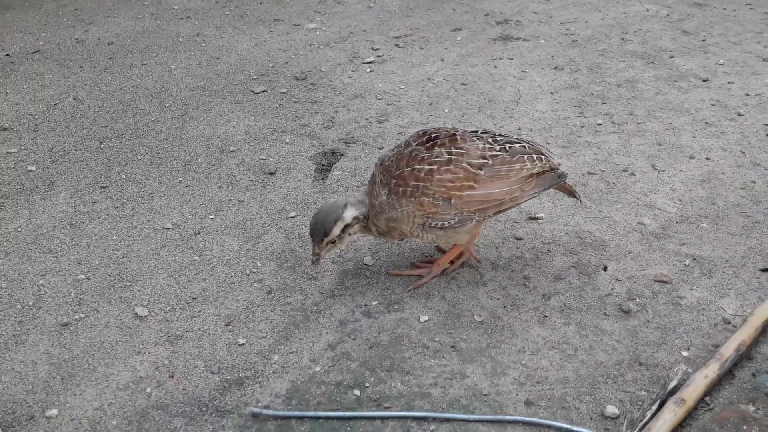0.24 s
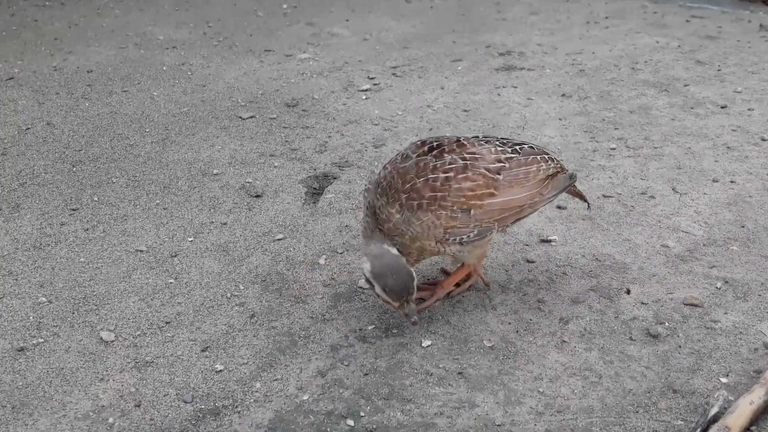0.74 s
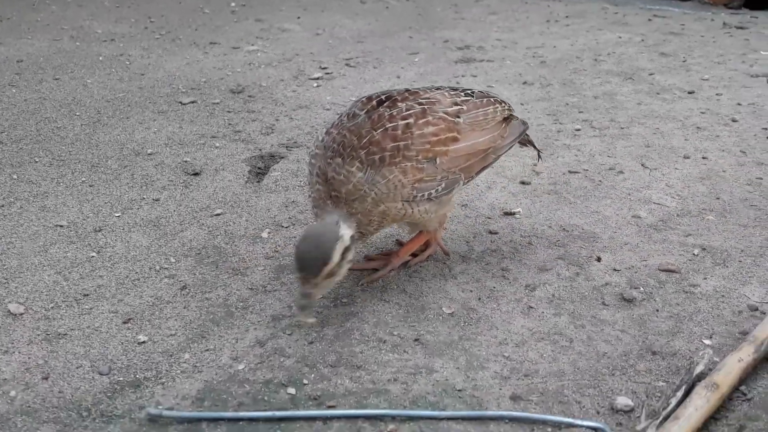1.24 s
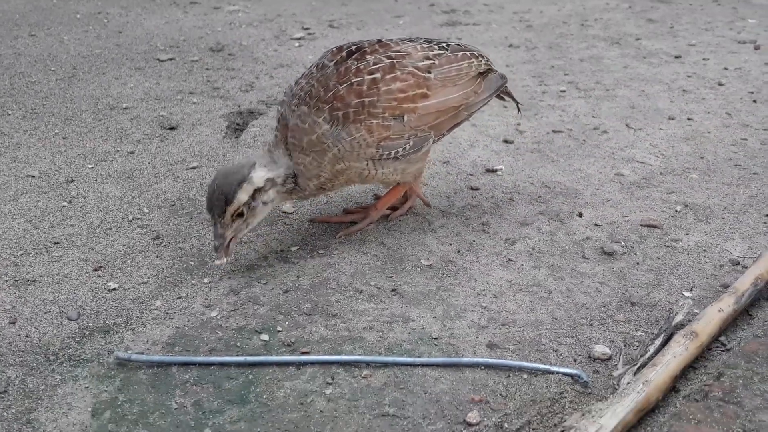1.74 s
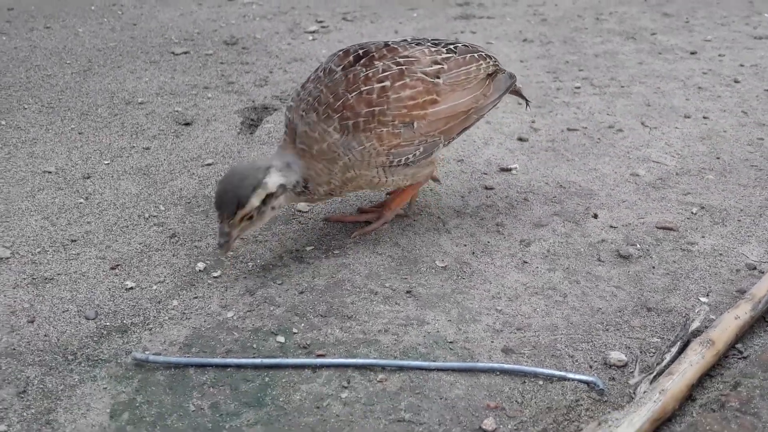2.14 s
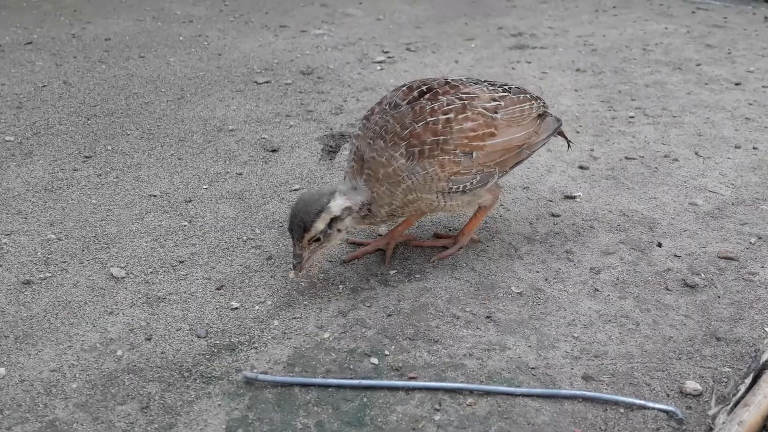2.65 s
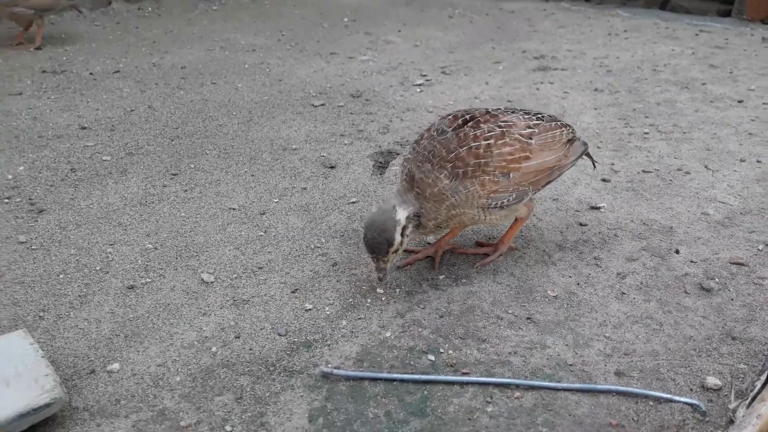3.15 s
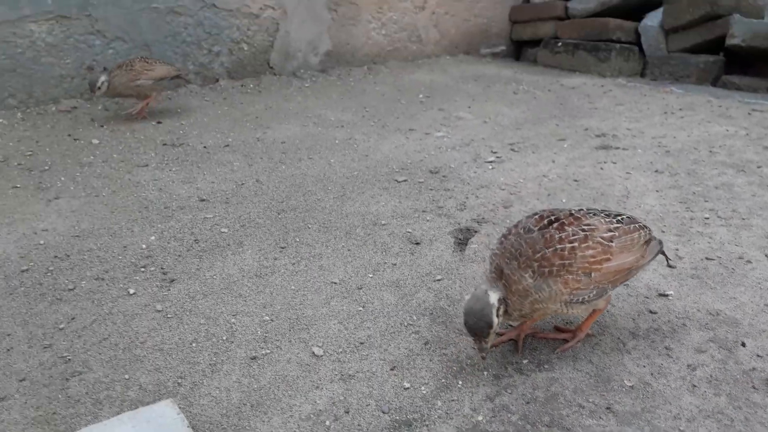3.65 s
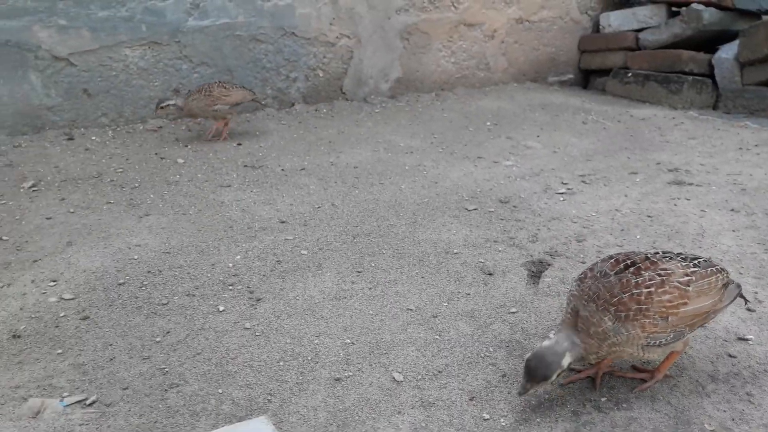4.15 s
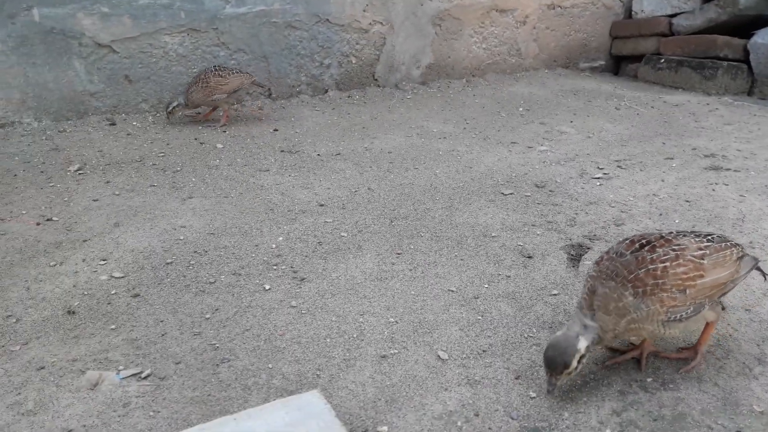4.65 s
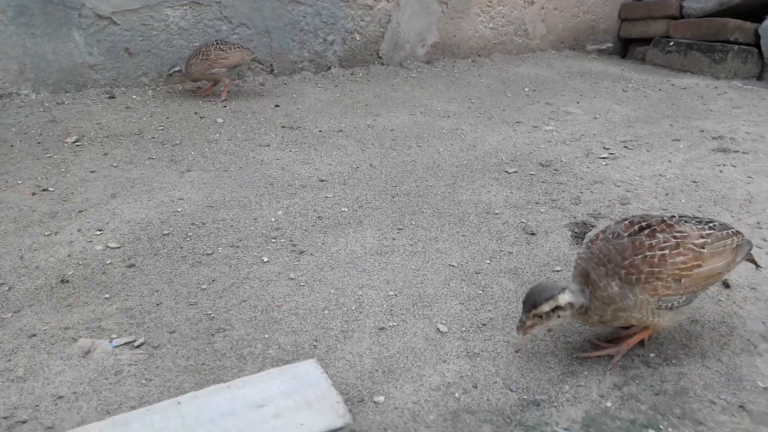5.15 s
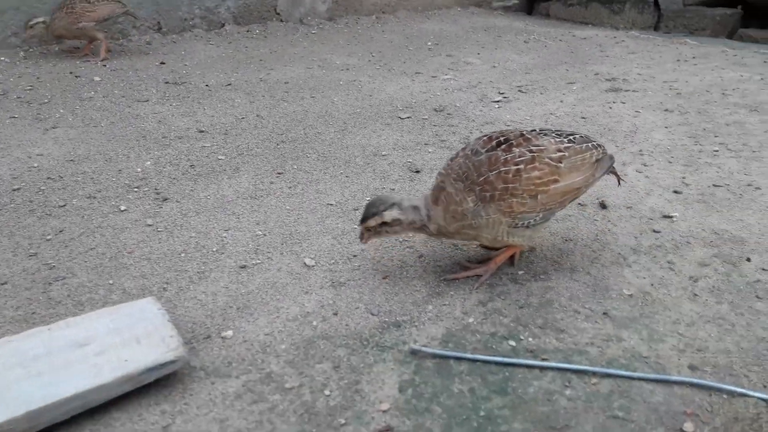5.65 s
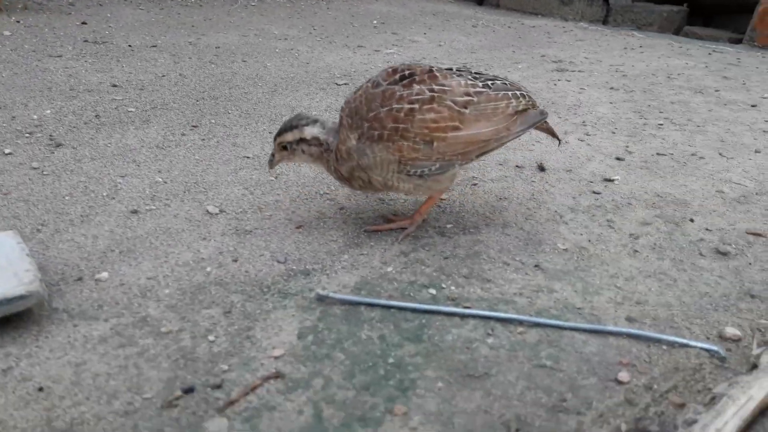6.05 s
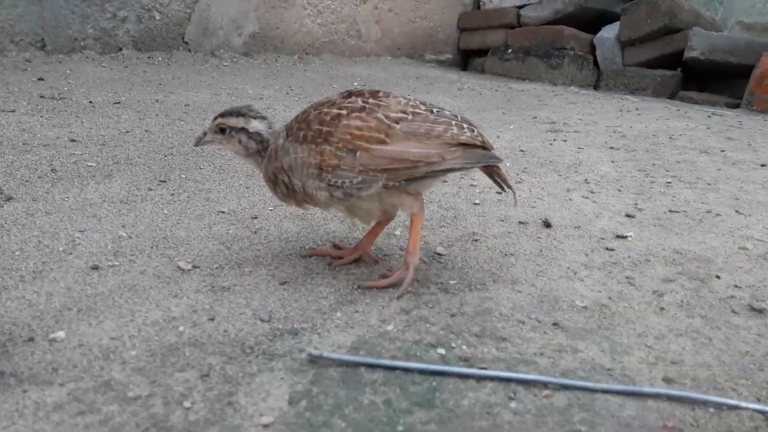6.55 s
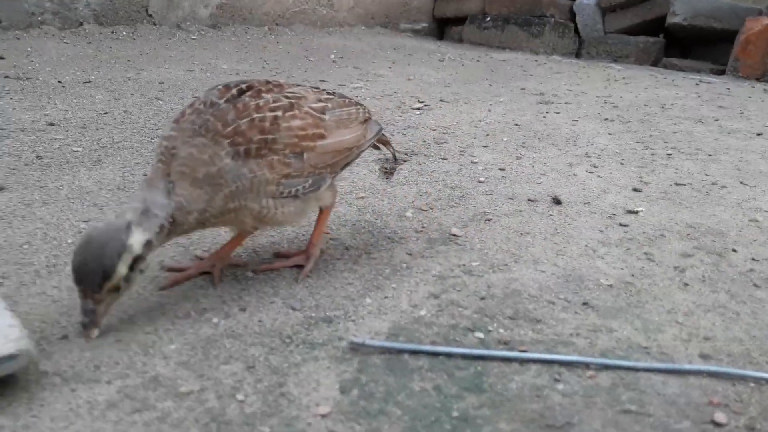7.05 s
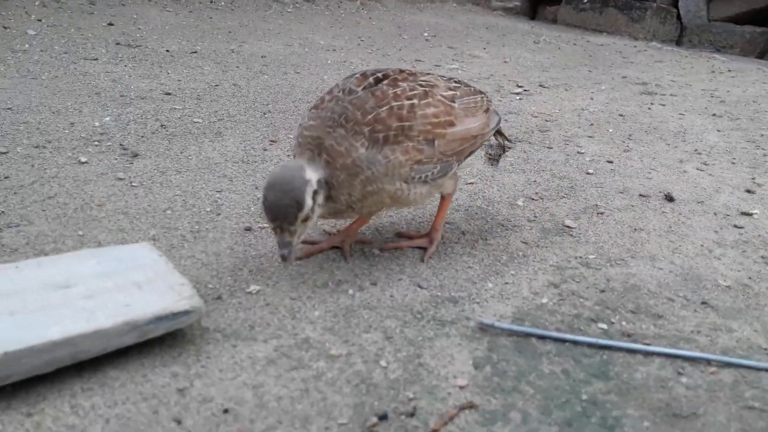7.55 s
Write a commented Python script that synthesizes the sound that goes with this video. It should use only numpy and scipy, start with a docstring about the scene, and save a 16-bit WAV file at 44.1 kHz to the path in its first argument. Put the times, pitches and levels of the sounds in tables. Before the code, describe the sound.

High peeps of feeding quail mix with pecks, scratching and sharp knocks outdoors, over a faint throbbing insect and low town rumble.

```python
"""Young quail peep and cluck as they feed in a sandy concrete yard. From the start an insect throbs
about eight times a second over a low town rumble. Soon feet scuff the grit, beaks tap the ground and
faint whines drift in. Something knocks and thumps nearby, hardest at about 2.5 s, just before a gust
of wind. From 4 s to nearly 6 s a far bird crows; then come more taps, scuffs and knocks as the
quail peep on."""
import sys
import numpy as np
from scipy import signal
from scipy.fft import rfft, irfft, next_fast_len
from scipy.io import wavfile
from scipy.ndimage import uniform_filter1d

SR = 44100
rng = np.random.default_rng(int(sys.argv[2]) if len(sys.argv) > 2 else 0)


def store_pcm(level_fs):
    """Save levels as 16-bit WAV."""
    pcm = np.round(np.clip(level_fs, -1, 1) * 32767).astype(np.int16)
    wavfile.write(sys.argv[1], SR, np.atleast_2d(pcm).T)


N = 343539


def bird_note(times, pitches, levels, octave_db, edge_s=0.0061):
    """A bird's voice box glides through 3 pitches (a slide) or 5 (a slide, then a flip up and down)."""
    t = np.arange(int(times[-1] * SR - 1)) / SR
    place = np.interp(t, times, np.arange(len(times)))
    stage, progress = place.astype(int), place % 1  # stages: 0 start, 1 slide, 2 flip up, 3 drop
    glide = .5 - .5 * np.cos(np.pi * progress ** np.where(stage == 2, 1.3, .75))
    rounded_top, plunge = 1 - (1 - glide) ** 1.8, progress ** 2.4
    ease = np.choose(stage, [np.sin(np.pi * progress / 2), glide, rounded_top, plunge])
    pitch = np.take(pitches, stage) + np.diff(pitches)[stage] * ease
    pitch *= 1 + 0.0087 * waver(len(t), 160).real
    phase = 2 * np.pi * np.cumsum(pitch) / SR
    edge = np.minimum(t / 2.6, 1.6 * (t[-1] - t)) / edge_s  # slow start, quick end
    fade = np.sin(np.pi / 2 * np.clip(edge, 0, 1)) ** 2
    level_db = np.interp(t, *levels) + 1.6 * waver(len(t), 70).real
    # The voice cracks in the flip: a bigger leap flutters more and is weaker at the top.
    leap_khz = np.clip(3 * (place - 2), 0, 1) * np.ptp(pitches[2:]) / 1000
    height = np.clip((pitch - pitches[-1]) / np.ptp(pitches), 0, 1)
    level_db += leap_khz * (1.7 * waver(len(t), 250).real - 2.2 * height)
    # The octave (twice the pitch) drops out in the flip and on high notes.
    octave = amp(octave_db) * np.clip(2 - 3 * (place - 1.9), 0, 1) / (1 + (pitch / 2850) ** 20)
    return np.sqrt(2) * amp(level_db) * fade * (np.sin(phase) + octave * np.sin(2 * phase))


# Peeps of the near quail: (time [s], length before the flip [s], crest pitch [Hz], low pitch [Hz],
# early level [dB], late level [dB], top pitch of the flip [Hz], flip level [dB])
PEEPS = [(0.128, 0.055, 2240, 1590, -56, -51.5, 3230, -53.5),
         (0.322, 0.058, 2420, 1810, -56, -53.5, 3350, -52),
         (0.522, 0.05, 2970, 2490, -46, -63, 3840, -50.5),
         (0.677, 0.051, 3403, 2990, -40.5, -38.5, 4090, -35.5),
         (.745, 0.029, 3300, 2320, -60, -56, 4650, -41.5),
         (0.865, 0.042, 3237, 3360, -38, -38, 4520, -36.5),
         (1.195, 0.057, 2020, 1600, -45.5, -48, 3070, -48), (1.242, 0.047, 1810, 1700, -48, -57, 4620, -51),
         (1.423, 0.042, 2700, 2380, -54, -48, 3830, -42.5),
         (1.593, 0.044, 3250, 2750, -39.5, -46, 3920, -41),
         (1.689, 0.043, 4150, 3340, -72, -53, 4830, -45.5), (1.703, 0.029, 3500, 2640, -58, -52, 3600, -58),
         (1.763, 0.044, 3367, 3080, -41.5, -39.5, 4240, -40.5),
         (2.024, 0.06, 2190, 1560, -46, -50.5, 3390, -49.5),
         (2.108, 0.036, 1850, 1687, -48, -43, 4320, -57), (2.233, 0.056, 3360, 2620, -39.5, -54, 3970, -42),
         (2.768, 0.052, 2210, 1535, -50, -48, 3010, -53.5),
         (2.95, 0.049, 2213, 1950, -43, -46.5, 3780, -50.5),
         (3.166, 0.047, 3000, 2260, -49, -57, 3510, -45.5),
         (3.274, 0.044, 2090, 1845, -58, -43.5, 4820, -57),
         (3.409, 0.046, 3565, 2905, -37.5, -39, 3900, -44.5),
         (3.611, 0.046, 3400, 2613, -42, -44.5, 3760, -41.5),
         (3.758, 0.043, 4030, 3000, -59, -62.5, 3900, -56.5),
         (3.818, 0.045, 3567, 3347, -41, -41, 4090, -52.5), (4.457, 0.025, 3200, 2600, -56, -61, 4400, -56),
         (4.586, 0.043, 3530, 2790, -40, -41.5, 3800, -43),
         (4.802, 0.031, 3515, 2940, -65, -51.5, 4150, -53),
         (4.846, 0.046, 4160, 3814, -47.5, -38, 4250, -41.5),
         (4.974, 0.038, 1910, 1654, -47, -51, 4440, -54), (5.107, 0.034, 4270, 3570, -80, -50.5, 4380, -55),
         (5.208, 0.065, 1780, 1363, -42.5, -50, 2540, -54),
         (5.214, 0.031, 2800, 2110, -57, -51, 4620, -49.5), (5.222, 0.046, 3600, 2720, -64, -50, 3550, -62),
         (5.391, 0.014, 4700, 4400, -71, -56, 5115, -43.5),
         (5.409, 0.047, 2740, 2000, -49, -49, 3470, -47.5),
         (5.598, .051, 2925, 2460, -47.5, -53.5, 3900, -34.5),
         (5.656, .06, 2075, 1805, -48, -43, 5110, -51.5), (5.791, 0.054, 3900, 3520, -45, -37, 3970, -37.5),
         (5.838, 0.048, 2550, 1947, -47.5, -38.5, 4780, -45.5),
         (6.117, 0.037, 2266, 1970, -58, -53.5, 4030, -56),
         (6.248, 0.067, 2170, 1440, -56, -50, 2620, -47.5), (6.334, 0.033, 3640, 2950, -69, -45, 4650, -51),
         (6.478, 0.029, 2450, 2304, -60, -44.5, 3750, -53), (6.509, 0.041, 2300, 1832, -47, -43, 5030, -37),
         (6.631, 0.036, 4160, 3840, -55, -50, 4740, -45), (6.637, 0.024, 1760, 1660, -52, -58, 3160, -44.5),
         (6.681, 0.044, 2810, 2102, -44.5, -40.5, 5180, -44),
         (6.965, 0.045, 3480, 2904, -39, -39, 3900, -37), (6.977, 0.048, 2210, 1824, -46, -44, 5100, -44),
         (7.175, 0.064, 4720, 2585, -78, -42, 5140, -43.5),
         (7.395, 0.066, 1830, 1168, -45, -48, 4430, -45.5),
         (7.595, 0.043, 2366, 1790, -42.5, -43, 3620, -38),
         (7.68, 0.043, 2104, 1806, -47, -42.5, 4780, -45),
         (7.737, 0.038, 3900, 2750, -66, -43, 4400, -42.5)]
def quail_peeps():
    """Each peep scoops up to a crest, slides down, then flips up and drops."""
    out = np.zeros(N)
    for start, slide_s, crest_hz, low_hz, early_db, late_db, top_hz, flip_db in PEEPS:
        # Higher peeps crest later and scoop up from further below.
        crest_s = min(0.00532 * crest_hz / 1000, .6 * slide_s)
        start_hz = crest_hz * (1 - 0.1113 * crest_hz / 3000)
        flip_s = .023 + .0058 * low_hz / 1000
        times = [0, crest_s, slide_s, slide_s + .5 * flip_s, slide_s + flip_s]
        pitches = [start_hz, crest_hz, low_hz, top_hz, 0.564 * low_hz]
        level_times = [.25 * slide_s, .75 * slide_s, slide_s, slide_s + .3 * flip_s, times[-1]]
        levels_db = [early_db, late_db, late_db, flip_db, flip_db - 3]
        add(out, start, bird_note(times, pitches, (level_times, levels_db), octave_db=-20))
    return out


# Softer notes and clucks: (time [s], length [s], start pitch [Hz], end pitch [Hz], level [dB])
CLUCKS = [(0.107, 0.06, 4080, 2500, -59), (0.485, 0.037, 1773, 1700, -47.5),
          (0.58, 0.027, 1072, 704, -54.5), (.6, 0.13, 550, 488, -62.5), (0.983, 0.077, 1620, 1456, -55),
          (1.103, 0.089, 2250, 1270, -60.5), (1.308, 0.064, 2060, 1370, -60),
          (1.478, 0.035, 2260, 2157, -46.5), (1.547, .05, 2150, 1700, -67),
          (1.841, 0.046, 1740, 1400, -55.5), (1.884, 0.065, 1744, 1524, -53),
          (2.364, 0.037, 2460, 2030, -52), (2.536, 0.031, 2710, 2060, -54.5),
          (2.746, 0.056, 2230, 1936, -47.5), (4.347, 0.064, 3130, 1830, -51),
          (4.573, 0.041, 2200, 2100, -59), (5.397, 0.03, 3900, 2880, -62), (5.372, 0.041, 938, 805, -55.5),
          (5.448, .068, 548, 462, -59.5), (5.978, 0.035, 2210, 2010, -43), (6.009, 0.041, 2420, 2210, -53),
          (6.017, 0.066, 1870, 1600, -48.5), (6.348, 0.08, 2020, 1640, -54.5),
          (6.447, 0.019, 2170, 2200, -48.5), (6.75, 0.055, 940, 720, -54.5),
          (6.977, 0.036, 4050, 3500, -56), (7.203, .042, 1880, 1660, -60), (7.429, 0.054, 2900, 2417, -54),
          (7.618, 0.081, 657, 770, -61.5), (7.714, 0.088, 424, 362, -60.5)]
def quail_clucks():
    """Each note holds its pitch for a moment, then slides, with no flip."""
    out = np.zeros(N)
    for start, length, start_hz, end_hz, db in CLUCKS:
        times = [0, 0.133 * length, length]
        pitches = [start_hz, start_hz + 0.087 * (end_hz - start_hz), end_hz]
        octave_db = max(7 - 15 * end_hz / 1000, -20)  # low clucks are richer than high notes
        add(out, start, bird_note(times, pitches, ([0], [db]), octave_db, edge_s=0.005))
    return out


def far_flock(count=110):
    """Birds further off chime in around the near peeps with faint falling notes."""
    out = np.zeros(N)
    for which, when, long, high, loud in rng.random((count, 5)):
        length, hz = .03 + .045 * long, 950 * 4. ** high ** 1.5
        start = abs(PEEPS[int(which * len(PEEPS))][0] + .3 * when - .1)
        times, pitches = [0, .2 * length, length], [hz, hz, .72 * hz]
        if not 2.9 < start < 4:  # the flock pauses here
            add(out, start, bird_note(times, pitches, ([0], [-72 + 9 * loud]), -9., edge_s=.008))
    return out


# The tone of sand: (frequency [Hz], relative level [dB])
GRIT_TONE = [(40, -3), (500, 3), (2300, -5), (4500, -15.5), (7000, -32), (16000, -41.5)]
# Strokes through the sand: (start [s], end [s], level [dB], treble lift [dB per octave])
SCUFFS = [(0.56, 0.84, -49.5, 4), (0.62, 0.714, -46.5, 9.5), (0.903, 1.005, -52, 6),
          (1.21, 1.305, -48.5, 9.5), (1.383, 1.569, -46.5, 9), (1.436, 1.478, -29, 18),
          (2.145, 2.423, -45, 1.5), (2.351, 2.477, -53, 7), (2.567, 2.723, -46.5, 4.5),
          (2.688, 2.891, -47, 5.5), (2.838, 2.938, -48.5, 5), (3.144, 3.168, -45, 14.5),
          (4.38, 4.58, -50, -2), (5.424, 5.508, -50.5, 4), (5.975, 6.103, -54.5, 9), (6.18, 6.25, -56, 8.5),
          (6.296, 6.466, -57, 6), (6.498, 6.657, -55, 5), (6.868, 6.96, -55.5, 8.5),
          (7.366, 7.409, -37.5, 12)]
def scuffs():
    """Feet and beaks drag through uneven grains of sand; each stroke swells and dies."""
    out = np.zeros(N)
    for start, end, db, tilt_db in SCUFFS:
        size = round((end - start) * SR)
        grains = rng.standard_normal(size)
        grains *= amp(3.5 * np.minimum(rng.exponential(1, size), 5) + 4. * waver(size, 110).real)
        grit = filtered(grains, lambda hz: tone_db(GRIT_TONE, hz) + tilt_db * np.log2((hz + 50) / 2000))
        swell = np.interp(np.linspace(0, 1, size), [0, 0.28, 1], [0, 1, 0]) ** 1.2
        add(out, start, amp(db) * unit_level(grit) * swell)
    return out


# Beak taps: (time [s], peak level [dB])
PECKS = [(1.242, -24), (1.4448, -31), (1.449, -30), (6.192, -44), (6.3215, -42), (6.4132, -40),
         (6.514, -38), (6.6275, -38), (7.6043, -38)]
def pecks(centre_hz=3200, fade_s=.002):
    """A beak hits concrete: a dry, bright click with a wisp of noise after it."""
    out, t = np.zeros(N), np.arange(400) / SR
    for start, db in PECKS:
        click = (rng.standard_normal(len(t)) + 5 * (t == 0)) * amp(-60 * t / fade_s)
        snap = filtered(np.roll(click, 20), lambda hz: -2.5 * np.log2((hz + 50) / centre_hz) ** 2)
        add(out, start, amp(db) * snap / abs(snap).max())
    return out


# Ringing tones in a tick: (highest pitch [Hz], relative level [dB], time to fade by 60 dB [s])
TICK_TONES = [(1700, -3.5, 0.018), (2260, 14.5, 0.003), (3900, 13.5, 0.0021), (740, 11, 0.0041)]
# Nearby knocks: (time [s], tick peak [dB], thump peak [dB], thump pitch [Hz])
KNOCKS = [(.19, -33, -48, 259), (0.257, -40.5, -45, 302), (0.785, -35.5, -38, 170),
          (1.317, -33.5, -42, 190), (1.845, -39.5, -47, 292), (1.904, -51, -38.5, 115),
          (2.294, -18.5, -32.5, 110), (2.423, -26.5, -28, 129), (2.567, -12, -25.5, 93),
          (2.741, -35, -40, 99), (3.101, -38.5, -31, 102.5), (3.724, -41.5, -49.5, 69.5),
          (5.119, -47, -43, 260), (6.253, -28, -34.5, 330), (6.858, -29, -72, 202),
          (7.391, -31, -41.5, 147)]
def knocks():
    """Each blow makes a ringing tick, a brief rattle and a thump that dies in a few swings."""
    out, t = np.zeros(N), np.arange(3000) / SR
    for start, tick_db, thump_db, thump_hz in KNOCKS:
        tick = sum(-amp(db - 60 * t / fade_s) * np.sin(2 * np.pi * hz * rng.uniform(0.83, 1.0) * t)
                   for hz, db, fade_s in TICK_TONES)
        rise_s = 0.00014 * amp(-.4 * (tick_db + 10.5))  # softer blows are duller
        tick *= np.minimum(t / rise_s, 1)
        rattle = amp(-39.5 - 60 * t / 0.083) * rng.standard_normal(len(t))
        thump = amp(-60 * t * thump_hz / 4.2) * np.sin(2 * np.pi * thump_hz * t)
        add(out, start, amp(tick_db) * (tick / abs(tick).max() + rattle))
        add(out, start, amp(thump_db) * thump / abs(thump).max())
    return out


def yard_echo(sound, fade_s=0.09, echo_db=-11.5):
    """Sound bounces off the ground and walls, adding a short tail of echoes."""
    delays = np.arange(80, 8000, 20)
    echoes = np.zeros(8020)
    strengths = rng.choice([-1., 1.], len(delays)) * amp(-60 * delays / SR / fade_s)
    echoes[delays + rng.integers(0, 20, len(delays))] = strengths
    return sound + amp(echo_db) * signal.oaconvolve(sound, echoes / np.linalg.norm(echoes))[:N]


# How rough the crowing is: (time [s], hoarseness [0 is pure, 1 or more is all noise])
CROW_HOARSENESS = [(3.96, 1.26), (4.16, 0.6), (4.36, 0.6), (4.7, 1.08), (4.8, 0.2), (5.1, 0.7), (5.3, 0.92),
                   (5.76, 1.4)]
# The crowing, one list per voice: (time [s], pitch [Hz], level [dB], octave level [dB])
CROW_VOICES = [
    [(3.96, 899, -60, -78), (3.98, 899, -58, -63), (4.05, 892, -58, -57.5), (4.1, 888, -67, -61),
     (4.15, 885, -55, -56.5), (4.36, 883.4, -52, -53.5), (4.4, 875.4, -58, -56.5), (4.56, 876, -65, -60.5),
     (4.73, 876.6, -60.5, -67), (4.77, 831.5, -62.5, -55), (5.0, 829, -62, -52.5), (5.1, 821, -65.5, -59.5),
     (5.43, 777, -63.5, -54.5), (5.74, 747, -80, -63.5)],
    [(3.96, 803, -54, -73), (3.98, 800, -54.5, -81), (4.09, 798, -63, -70), (4.13, 787.4, -52.5, -62.5),
     (4.37, 789, -59, -68), (4.41, 799, -59, -75), (4.57, 797, -69, -85), (4.6, 791, -58, -64.5),
     (4.76, 755, -62, -64), (4.8, 790, -61, -74)],
]
def far_crowing(blur_hz=49):
    """A far bird crows in two rough voices, each a stack of tones at 1 to 4 times its pitch."""
    out = np.zeros(N)
    for voice, third_db in zip(CROW_VOICES, (-31.5, -13)):
        times, *columns = np.transpose(voice)
        t = np.arange(times[0], times[-1], 1 / SR)
        hz, base_db, octave_db = (np.interp(t, times, column) for column in columns)
        hoarseness = curve(CROW_HOARSENESS, t)
        for k, db in enumerate((base_db, octave_db, base_db + third_db, octave_db - 16), 1):
            add(out, times[0], amp(db) * rough_tone(k * hz, k * blur_hz, hoarseness))
    return out


# Faint whines: (start [s], end [s], start pitch [Hz], end pitch [Hz], level [dB])
WHINES = [(0.952, 2.158, 755, 1029, -68.5), (2.171, 2.41, 3760, 3820, -60), (3.781, 4.722, 1323, 1308, -71),
          (4.383, 4.503, 4190, 4020, -62), (4.8, 5.165, 958, 995, -63), (6.394, 7.156, 898, 1063, -64.5),
          (7.204, 7.557, 1093, 1137, -69.5)]
def whines():
    """Single blurred tones fade in and out, most of them rising."""
    out = np.zeros(N)
    for start, end, start_hz, end_hz, db in WHINES:
        size = round((end - start) * SR)
        tone = rough_tone(np.linspace(start_hz, end_hz, size), 0.054 * start_hz, 1)
        add(out, start, amp(db) * tone * signal.windows.tukey(size, .15))
    return out


# The insect's pace: (time [s], throbs so far [count])
THROB_COUNT = [(0, -.32), (1.126, 8), (2.287, 17), (2.459, 18), (3.24, 24), (4.605, 35), (5.009, 38),
               (6.504, 50), (6.665, 51), (7.8, 59.93)]
# Its slow swells: (time [s], boost [dB])
INSECT_SWELLS = [(0, -2), (1.5, 4), (3.3, -2), (7.79, 5.5)]
def insect(steady_share=.12):
    """Fast wing clicks blur into a high band of noise that swells once per throb."""
    t = np.arange(N) / SR
    throb = (.5 + .5 * np.cos(2 * np.pi * curve(THROB_COUNT, t))) ** 2.3
    wings = sum(amp(db) * (np.exp(2j * np.pi * hz * t) * waver(N, width_hz)).real
                for hz, width_hz, db in [(6490, 86, -70.5), (6075, 640, -67.5)])
    return wings * (steady_share + throb) * amp(curve(INSECT_SWELLS, t))


# One short, low puff of wind: (start [s], end [s], pitch [Hz], width [Hz], level [dB])
WIND_PUFF = (1.47, 1.58, 217, 149.5, -49)
def wind_puff():
    """A puff of wind makes a lumpy low noise that sets in quickly and dies away."""
    start, end, hz, width_hz, db = WIND_PUFF
    out, size = np.zeros(N), round((end - start) * SR)
    fade_db = np.interp(np.linspace(0, 1, size), [0, .04, .9, 1], [-20, 0, -6, -20])
    add(out, start, amp(db + fade_db) * rough_tone(np.full(size, hz), width_hz, 1))
    return out


# Gusts of wind: (time [s], level [dB])
GUSTS = [(0, -69), (2.55, -67), (2.62, -47.5), (2.9, -58), (3.301, -70), (5.9, -78), (7.79, -71.5)]
def wind():
    """Wind buffets the microphone with a low, lumpy noise."""
    tone = [(30, -30.5), (90, 1), (200, -6), (500, -11), (2000, -62.5)]
    noise = unit_level(filtered(rng.standard_normal(N), lambda hz: tone_db(tone, hz)))
    return noise * amp(curve(GUSTS, np.arange(N) / SR) + 5. * waver(N, 9.).real)


# The tone of the town: (frequency [Hz], relative level [dB])
TOWN_TONE = [(25, 9.5), (100, 6.5), (370, -8.5), (900, -7), (1300, -11), (1700, -0.5), (2600, -9.5),
             (3400, -7.5), (5100, -11), (7000, -17.5)]
# Its loudness above 250 Hz: (time [s], level [dB])
TOWN_LEVELS = [(0.0, -55), (0.78, -55.5), (2.84, -56.5), (3.66, -61), (4.21, -57.5), (5.529, -56.5),
               (6.01, -55.5), (6.51, -51), (7.79, -56)]
def town(rumble_db=-57):
    """The town rumbles and hisses in drifting patches, built from short slices of noise."""
    slices, hz = N // 256 + 5, np.fft.rfftfreq(1024, 1 / SR)
    real, imaginary, patches = rng.standard_normal((slices, 513, 3)).T
    patches = unit_level(uniform_filter1d(uniform_filter1d(patches, 14, 0), 30, 1))
    level_db = np.where(hz[:, None] > 250, curve(TOWN_LEVELS, np.arange(slices) * 256 / SR), rumble_db)
    shape_db = tone_db(TOWN_TONE, hz)
    spectrum = (real + 1j * imaginary) * amp(shape_db[:, None] + 3. * patches + level_db)
    wash = signal.istft(spectrum, nperseg=1024, noverlap=768)[1][:N]
    scale = 1024 * np.sqrt(np.mean(amp(2 * shape_db)) / 768)
    return wash / scale


def amp(db):
    """Turns decibels into a number to multiply by."""
    return 10 ** (np.asarray(db) / 20)


def unit_level(sound):
    """Scales a sound to an average power of 1."""
    return sound / np.sqrt(np.mean(sound ** 2) + 1e-20)


def curve(points, t):
    """Joins (time, value) points with straight lines."""
    return np.interp(t, *np.transpose(points))


def tone_db(points, hz):
    """Looks up hz in a list of (frequency [Hz], level [dB])."""
    frequencies, levels = np.transpose(points)
    return np.interp(np.log(hz + 1), np.log(frequencies + 1), levels)


def add(mix, start_s, sound):
    """Mixes a sound in at the given time."""
    part = mix[round(start_s * SR):][:len(sound)]
    part += sound[:len(part)]


def filtered(sound, db_at):
    """Turns each frequency up or down by db_at(frequency) decibels."""
    size = next_fast_len(sound.shape[-1])
    gain = amp(db_at(np.fft.rfftfreq(size, 1 / SR)))
    return irfft(rfft(sound, size) * gain, size)[..., :sound.shape[-1]]


def waver(size, width_hz):
    """A smooth random wobble (complex numbers, power 1); a larger width wobbles faster."""
    smoothing = [1, -np.exp(-np.pi * width_hz / SR)]
    noise = rng.standard_normal(size) + 1j * rng.standard_normal(size)
    noise = signal.lfilter([1], smoothing, signal.lfilter([1], smoothing, noise))
    return noise / np.sqrt(np.mean(abs(noise) ** 2))


def rough_tone(hz, blur_hz, hoarseness):
    """A tone follows the pitches hz, with a share of it blurred into noise."""
    share = np.clip(hoarseness, 0, 1)
    tone = np.exp(2j * np.pi * np.cumsum(hz) / SR)
    return np.sqrt(2) * (tone * (np.sqrt(1 - share ** 2) + share * waver(len(hz), blur_hz))).real


def scene():
    """The birds and knocks echo in the yard over the background, the same in both ears."""
    yard = yard_echo(quail_peeps() + quail_clucks() + far_flock() + scuffs() + knocks() + pecks())
    mono = yard + far_crowing() + whines() + wind_puff() + insect() + town() + wind()
    return np.array([mono, mono])


# How the microphone colours the sound: (frequency [Hz], boost [dB])
MIC_TONE = [(25, -15), (70, 3), (6500, 7.5), (7100, -1.5), (8500, -13.5), (10800, -4), (12500, -11),
            (16000, -26.5)]
def record(dry, cutoff_hz=15750):
    """The microphone dulls the treble above 7 kHz, adds faint hiss and cuts off the very top."""
    hiss_tone = [(100, 2.5), (3000, -6), (8500, -12), (11000, -6.5), (16000, -1)]
    hiss = filtered(rng.standard_normal((3, N)), lambda hz: tone_db(hiss_tone, hz))
    heard = filtered(dry, lambda hz: tone_db(MIC_TONE, hz))
    heard += amp(-66.5) * hiss[:2] + amp(-91.5) * hiss[2]  # each side's own hiss, plus a shared one
    low_pass = signal.firwin(511, cutoff_hz, window=("kaiser", 9), fs=SR)
    return signal.oaconvolve(heard, low_pass[None], "same")


dry = scene()
out = record(dry)
store_pcm(out)
```